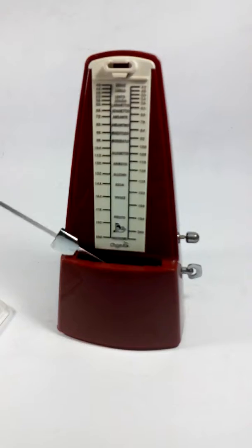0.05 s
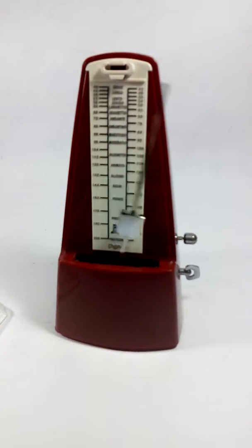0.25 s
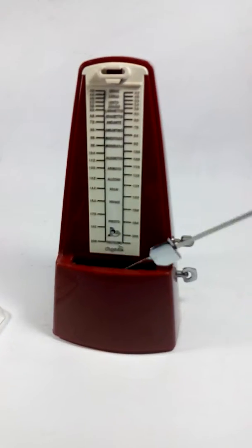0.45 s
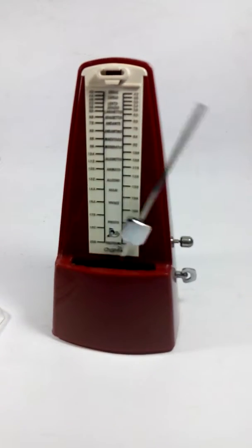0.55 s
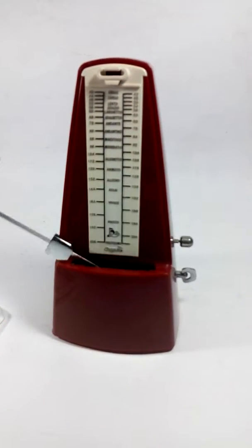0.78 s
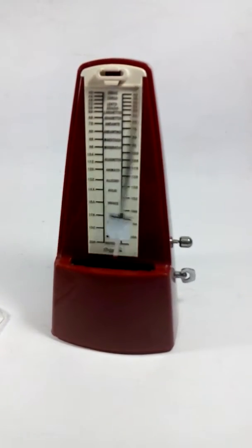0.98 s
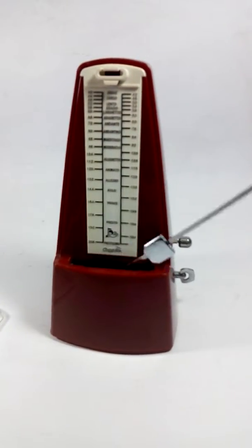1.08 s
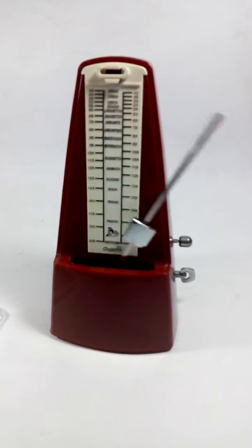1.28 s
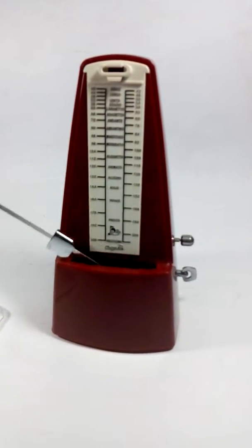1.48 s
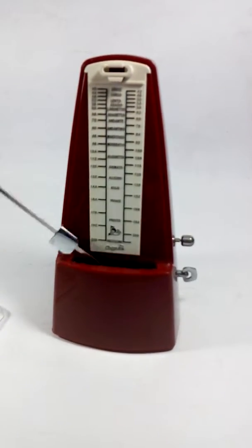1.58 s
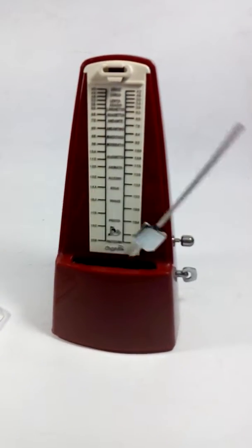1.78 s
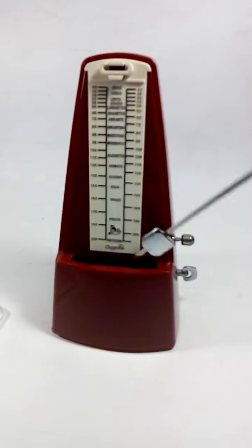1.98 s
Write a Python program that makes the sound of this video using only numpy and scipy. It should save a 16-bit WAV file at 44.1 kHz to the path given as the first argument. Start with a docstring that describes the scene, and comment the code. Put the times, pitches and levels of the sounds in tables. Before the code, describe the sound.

Close clockwork metronome clicking fast and slightly lopsided, each tick ringing briefly in a small room.

```python
"""A small quiet room, a plastic-cased clockwork metronome close by, ticking slightly lopsidedly at about 160 a minute.
At each swing a tooth drops on a pallet: shaped noise makes the hard crack, decaying sines the knock of the case,
the boom of base and table and the faint ring of steel; dense noise makes the shimmer of the spring.
The two pallets sound a little different, and a soft thud follows each tick as the pendulum turns.
The room adds a short noise tail; behind lie a low rumble, faint hiss and mains hum, stronger on the left."""
import sys
import numpy as np
from scipy import signal
from scipy.fft import rfft, irfft
from scipy.io import wavfile
from scipy.ndimage import uniform_filter1d

SR = 44100
rng = np.random.default_rng(int(sys.argv[2]) if len(sys.argv) > 2 else 0)


def to_wav(s):
    """Save 16-bit WAV."""
    ch = np.atleast_2d(s).T  # columns
    pcm = np.round(np.clip(ch, -1, 1) * 32767)  # PCM
    wavfile.write(sys.argv[1], SR, pcm.astype(np.int16))


N = 90404
TIME = np.arange(N) / SR  # s
FREQS = np.maximum(np.fft.rfftfreq(N, 1 / SR), 1)  # Hz, kept above zero for the logarithm

# Tooth drops on the pallets; the first comes before the start and is only heard ringing out.
# Each row: start in seconds, level in dB, pallet (0 or 1), extra level of the steel ring in dB.
TICKS = [(-0.114, 2, 1, 1), (0.2492, 0.5, 0, 3), (0.6285, -2, 1, -1), (0.9919, 0.5, 0, 0),
         (1.3722, -1.5, 1, 0), (1.736, 0.5, 0, -7)]
CRACK_LIKENESS, ROOM_LIKENESS = -0.084, 0.61  # correlation of left and right noise
LEFT_RIGHT_DB = np.array([[4], [-4]])  # thuds and background lean to the left


def from_db(db):
    """Decibels to gain."""
    return 10 ** (np.asarray(db) / 20)


def rms_one(x):
    """Scale to rms 1."""
    return x / np.sqrt(np.mean(x ** 2) + 1e-20)


def at_hz(rows, hz, axis=1):
    """Read a table column on a log-frequency axis."""
    rows = np.array(rows)
    return np.interp(np.log(hz), np.log(rows[:, 0]), rows[:, axis])


def dying(t60):
    """Exponential decay from 1, falling 60 dB in t60 seconds."""
    return np.exp(-np.minimum(np.log(1000) * TIME / t60, 40))


def coloured(x, db):
    """Causal (minimum-phase) filter with the given dB at FREQS."""
    cepstrum = irfft(np.log(from_db(db)), N)
    # Folding the cepstrum onto positive times gives the minimum phase.
    cepstrum[1:N // 2] *= 2
    cepstrum[N // 2 + 1:] = 0
    return irfft(rfft(x) * np.exp(rfft(cepstrum)), N)


def evened(x, size):
    """Flatten the spectrum over spans of size bins, keeping the fine grain; energy about 1."""
    power = uniform_filter1d(np.abs(rfft(x)) ** 2, size=size)
    return coloured(x, -10 * np.log10(np.maximum(power, 1e-12)))


def stereo_noise(likeness):
    """White noise on two channels with the given correlation."""
    mid, side = rng.standard_normal((2, N))
    c = np.clip(likeness, -1, 1)
    opposite = np.array([[1], [-1]])
    return (np.sqrt(1 + c) * mid + np.sqrt(1 - c) * side * opposite) / np.sqrt(2)


def voiced(x, table, pallet):
    """Give a stereo burst the spectrum of a table, as it is for this pallet."""
    change_db = pallet * at_hz(table, FREQS, axis=3)
    channels = []
    for c in (0, 1):
        level_db = at_hz(table, FREQS, axis=c + 1) + change_db
        channels.append(coloured(evened(x[c], size=1500), level_db))
    return np.array(channels)


def add(out, sound, s):
    """Mix a sound in at time s, losing any part before the start."""
    start = int(s * SR)
    out[:, max(start, 0):N + min(start, 0)] += sound[:, max(-start, 0):N - max(start, 0)]


def ring(modes, pallet, rise_s):
    """Struck modes as decaying sines, neighbours in opposite sign, the right channel lagging slightly in phase."""
    right_lag_s, varies_db = .00013, .6
    out = np.zeros((2, N))
    t = TIME - np.array([[0], [right_lag_s]])
    for k, (hz, left_db, right_db, t60, second_db) in enumerate(modes):
        level_db = np.array([[left_db], [right_db]]) + pallet * second_db
        gain = from_db(level_db + varies_db * rng.standard_normal())
        n = min(int(2 * t60 * SR), N)  # stop 120 dB down
        decay = from_db(-60 * TIME[:n] / t60)
        out[:, :n] += (-1) ** k * gain * np.sin(2 * np.pi * hz * t[:, :n]) * decay
    return out * (1 - np.exp(-TIME / rise_s))


def spring():
    """Each tick shakes the coiled spring into a dense shimmer of many close rings: fresh, decaying noise."""
    # Each row: Hz, left level in dB, right level in dB, change on the second pallet in dB.
    shimmer = [(600, -24, -22.5, -1), (1300, -10.5, -23, -6.5), (1600, -15, -35, 6),
               (1934, -4.5, -21, -2.5), (2500, 0, -18, 2), (3213, -18.5, -29.5, -2),
               (3650, -18, -22.5, 0.5), (4250, -8, -13.5, 7), (5100, -22.5, -22.5, 0.5),
               (6330, -17, -25, 1), (7910, -30, -29, -2.5), (15000, -36.5, -37, -1)]
    out = np.zeros((2, N))
    for s, db, pallet, _ in TICKS:
        burst = stereo_noise(ROOM_LIKENESS) * dying(0.41)
        add(out, from_db(db) * voiced(burst, shimmer, round(pallet)), s)
    return out


def room(x):
    """Dense reflections, as noise that dies away band by band, convolved with the sound."""
    # Tail of the room. Each row: Hz, left level in dB, right level in dB, 60 dB decay time in seconds.
    tail_bands = [(277.8, -10, -9.5, .15), (580, 8, 4.5, 0.21), (1030, -7, -8.5, 0.15),
                  (2000, -7.5, -3, .23), (4100, -1.5, -14, 0.23), (7850, -5, -7.5, 0.16),
                  (15200, -3, -4.5, 0.2)]
    delay_s, rise_s, fade_s = 0.0027, 0.0035, 0.13  # the tail steepens around fade_s
    white, tail = rfft(stereo_noise(ROOM_LIKENESS)), 0
    centres = np.geomspace(250, 16000, 7)  # Hz
    for hz, pick in zip(centres, np.eye(len(centres))):
        band = np.interp(np.log(FREQS), np.log(centres), pick)
        tail = tail + irfft(white * band, N) * dying(at_hz(tail_bands, hz, axis=3))
    onset = 1 - np.exp(-np.maximum(TIME - delay_s, 0) / rise_s)
    tail = tail * onset / (1 + (TIME / fade_s) ** 4)
    response = np.array([
        coloured(evened(tail[c], size=110), at_hz(tail_bands, FREQS, axis=c + 1)) for c in (0, 1)])
    return signal.fftconvolve(x, response, axes=1)[:, :N]


def background():
    """Room hiss, a wavering low rumble and faint mains hum, all stronger on the left."""
    # Colour of the hiss, before its level is set. Each row: Hz, relative density in dB per Hz.
    hiss_colour = [(47, -14.5), (90, -10), (165, -9), (240, -22), (430, -18), (640, -22.5), (1100, -26),
                   (1500, -30), (2600, -30), (3200, -42), (4400, -41), (8000, -46.5), (10500, -56),
                   (15000, -55)]
    # Course of the low rumble. Each row: time in seconds, relative level in dB.
    rumble_course = [(0.0, -55.5), (0.17, -55.5), (0.26, -56.5), (0.42, -52), (0.48, -64), (0.63, -60.5),
                     (0.66, -80), (0.71, -59), (0.87, -51.5), (0.91, -74.5), (1.23, -68), (1.49, -72),
                     (1.63, -48.5), (1.66, -65), (1.8, -68), (2.05, -70)]
    rumble_hz, rumble_width_hz, rumble_trim_db = 56.2, 8.2, -4
    hiss_db, hum_db, hum_hz = -62, -66, 100  # levels ahead of the lean to the left

    hiss = coloured(stereo_noise(0.78), at_hz(hiss_colour, FREQS))
    low_cut = signal.butter(2, 60, "high", fs=SR, output="sos")
    hiss = rms_one(signal.sosfilt(low_cut, hiss))

    narrow = 1 / (1 + ((FREQS - rumble_hz) / rumble_width_hz) ** 4)
    rumble = signal.hilbert(irfft(rfft(rng.standard_normal(N)) * narrow, N))
    rumble = rms_one(np.cos(np.angle(rumble)))  # steady strength, wandering phase
    rumble = rumble * from_db(rumble_trim_db + np.interp(TIME, *np.transpose(rumble_course)))
    rumble = signal.sosfilt(signal.butter(2, 2 * rumble_hz, fs=SR, output="sos"), rumble)

    hum = from_db(hum_db) * np.sin(2 * np.pi * hum_hz * TIME)
    return (from_db(hiss_db) * hiss + rumble + hum) * from_db(LEFT_RIGHT_DB)


def crack(grain, pallet):
    """The tooth chatters for an instant: noise held, then decaying, with a grain that varies a little per tick."""
    # Countless short rings of the works.
    # Each row: Hz, left level in dB, right level in dB, change on the second pallet in dB.
    crack_colour = [(298, -26, -16, 2), (600, -8.5, -16, -2.5), (1020, 9.5, -14, 0.5), (1370, 11, -5.5, 4),
                    (2300, 13.5, 2.5, 2), (3000, 8, 4.5, 0.5), (4240, 6, 8, -2), (5190, 3.5, 2.5, 0.5),
                    (6970, 10.5, 4, 0), (8100, 1.5, -12.5, 2.5), (9090, 6, 2.5, 0), (10380, -9.5, -5, 1),
                    (12000, -3, -7.5, 0.5), (15600, -7.5, -18, -0.5), (16400, -19.5, -22, -5)]
    hold_s, t60_s, varies = 0.0032, 0.025, 0.45
    envelope = np.interp(TIME - hold_s, TIME, dying(t60_s))
    chatter = grain + varies * stereo_noise(CRACK_LIKENESS)
    return voiced(chatter * envelope, crack_colour, pallet)


def metronome():
    """Every tick is a crack plus the ring of case, base and steel; returns cracks and rings apart."""
    # Each row of the three tables: Hz, left level in dB, right level in dB,
    # 60 dB decay time in seconds, change on the second pallet in dB.
    case_modes = [(824, -20.5, -26, 0.035, 0), (906, -19.5, -23.5, 0.034, 0.5),
                  (982, -20.5, -29.5, 0.079, -0.5), (1050.7, -14.5, -26.5, 0.04, 0.5),
                  (1320, -44, -46, .09, 0), (1597, -18.5, -42.5, 0.023, 6),
                  (1949, -17.5, -41.5, 0.023, 4.5), (2200, -19.5, -34.5, 0.026, 3.5),
                  (2527, -26, -35, 0.1, -3), (2600, -32, -46.5, 0.074, -10.5), (3500, -30, -21.5, .036, 2),
                  (4160, -36.5, -23, 0.083, 2), (4169, -23, -20, 0.05, -0.5), (4556, -57, -23, 0.031, -3),
                  (4704, -60, -31.5, .035, -2.5), (5970, -50, -37, 0.12, -4.5),
                  (6917, -44.5, -13.5, 0.013, 0), (7700, -34.5, -37.5, .03, 3.5),
                  (9050, -42.5, -29, 0.048, -6)]  # plastic case
    boom_modes = [(302.9, -31, -37.5, 0.24, -2), (340, -40, -46, 0.14, -6.5), (367, -36.5, -42, 0.21, 2),
                  (425.6, -40, -40.5, 0.18, -1), (494.3, -44, -50, 0.097, -1), (678, -44, -50, .12, 2)]  # hollow base and table, slow to build
    steel_modes = [(2690, -59, -66, 0.28, -6.5), (4240, -59, -62, .25, 0), (6300, -75.5, -75.5, 0.35, -1),
                   (9290, -62.5, -59.5, 0.69, -1)]  # rod and wheels
    case_rise_s, boom_rise_s = .0002, 0.0046
    grains = [stereo_noise(CRACK_LIKENESS) for _ in (0, 1)]  # one for each pallet
    cracks, rings = np.zeros((2, 2, N))
    for s, db, pallet, steel_db in TICKS:
        p = int(round(pallet))
        add(cracks, from_db(db) * crack(grains[p], p), s)
        knock = ring(case_modes, p, case_rise_s) + ring(boom_modes, p, boom_rise_s)
        add(rings, from_db(db) * knock, s)
        add(rings, from_db(db + steel_db) * ring(steel_modes, p, case_rise_s), s)
    return cracks, rings


def thuds():
    """The pendulum turns shortly after each tick and nudges the table: a soft swell of low noise."""
    delay_s, length_s, level_db = 0.054, 0.026, -57
    low_band = signal.butter(2, [80, 192.4], "band", fs=SR, output="sos")  # Hz
    noise = signal.sosfilt(low_band, rng.standard_normal(N))
    swell = sum(np.exp(-((TIME - s - delay_s) / length_s) ** 2) for s, *_ in TICKS)
    return rms_one(noise) * swell * from_db(level_db + LEFT_RIGHT_DB)


def scene():
    """The metronome close by, its room and the background."""
    cracks, rings = metronome()
    to_room = cracks + from_db(-0.5) * rings  # the rings feed the room a little less
    return cracks + rings + spring() + room(to_room) + thuds() + background()


def record(dry):
    """The top is cut steeply above 16.2 kHz by an elliptic low-pass."""
    return signal.sosfilt(signal.ellip(10, .1, 80, 16200, fs=SR, output="sos"), dry)


dry = scene()
out = record(dry)
to_wav(out)
```